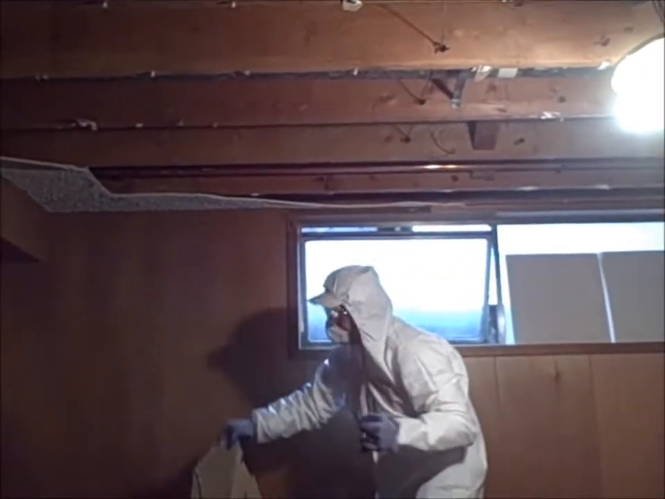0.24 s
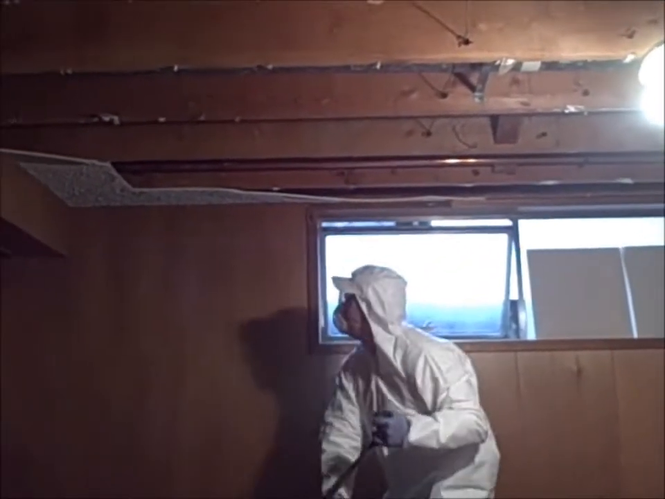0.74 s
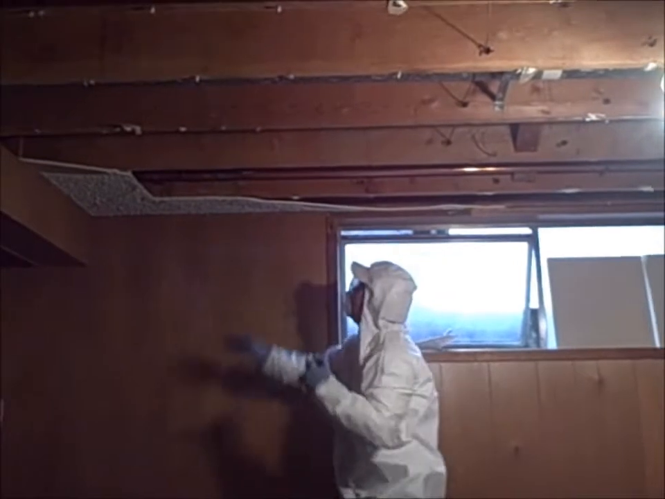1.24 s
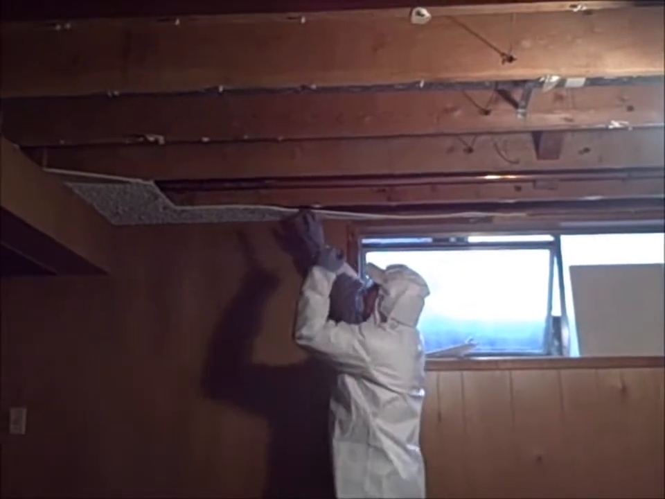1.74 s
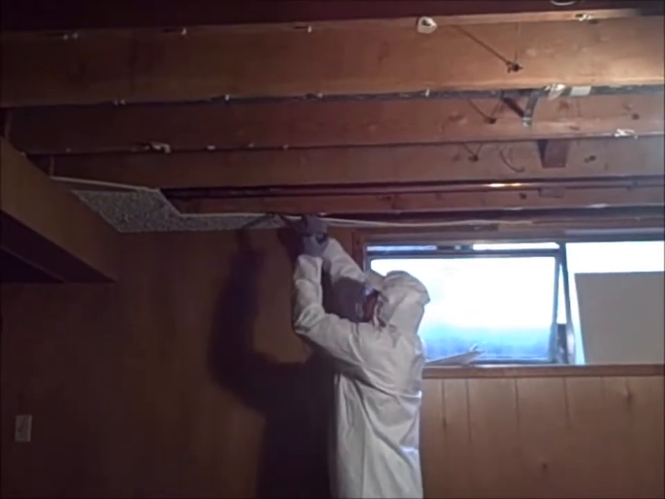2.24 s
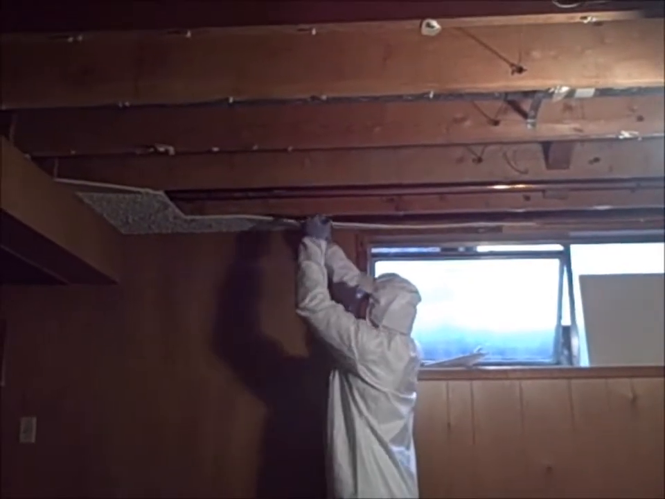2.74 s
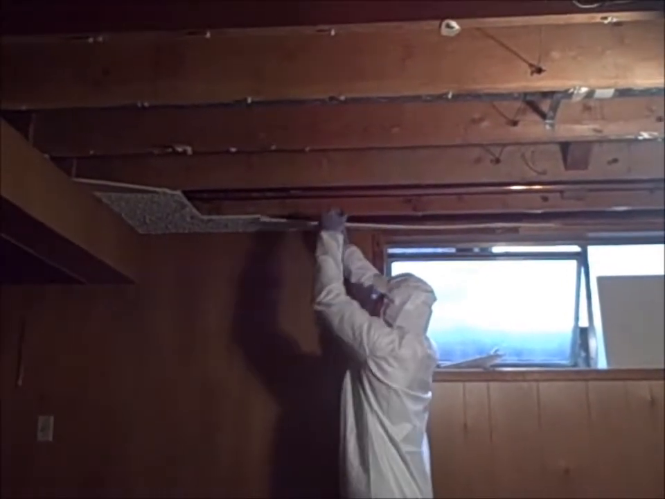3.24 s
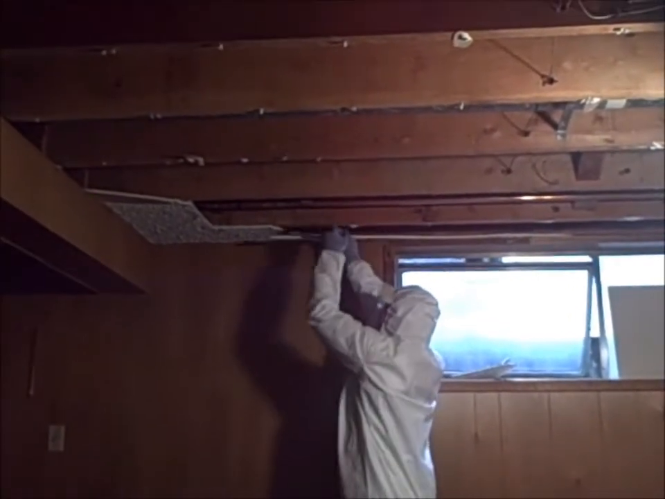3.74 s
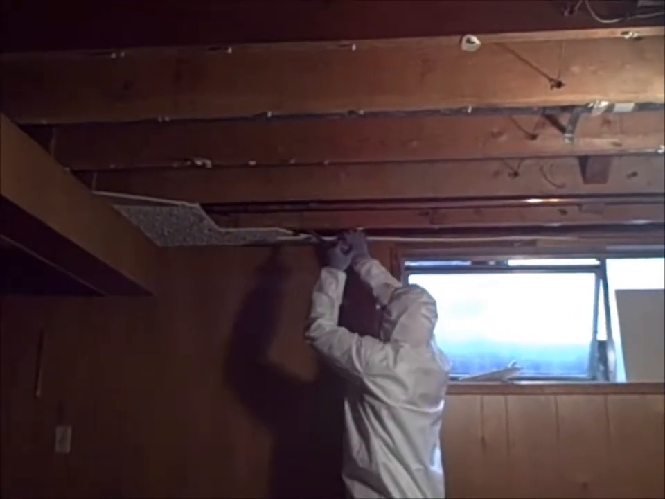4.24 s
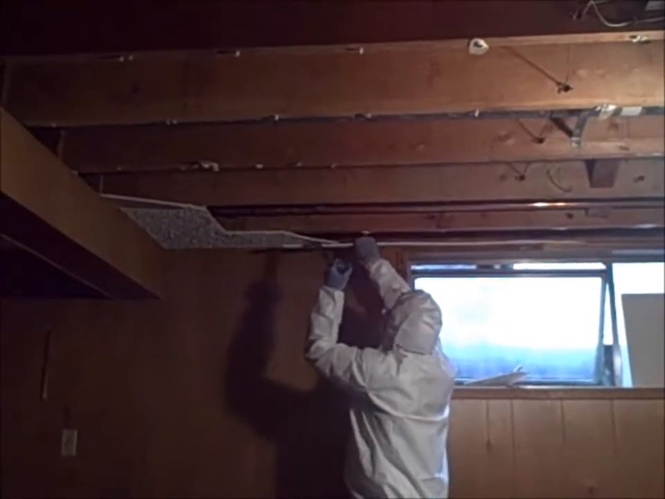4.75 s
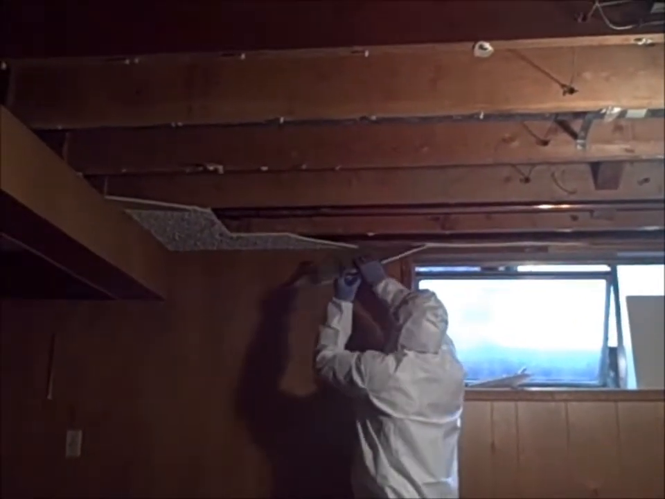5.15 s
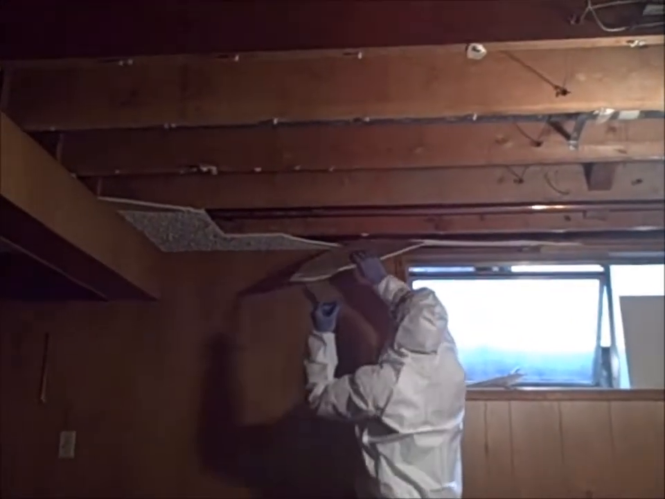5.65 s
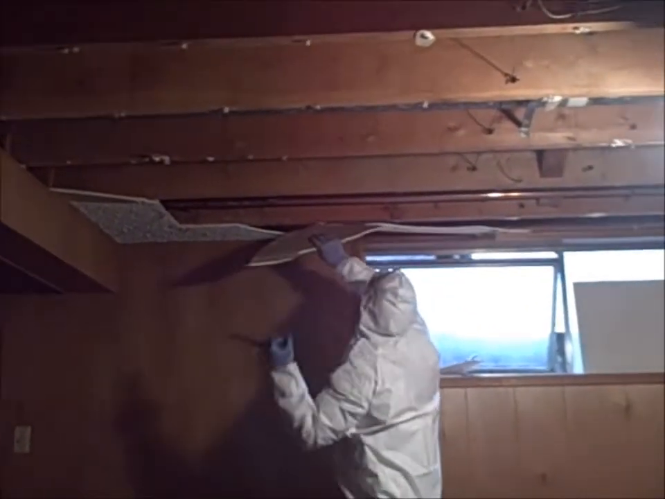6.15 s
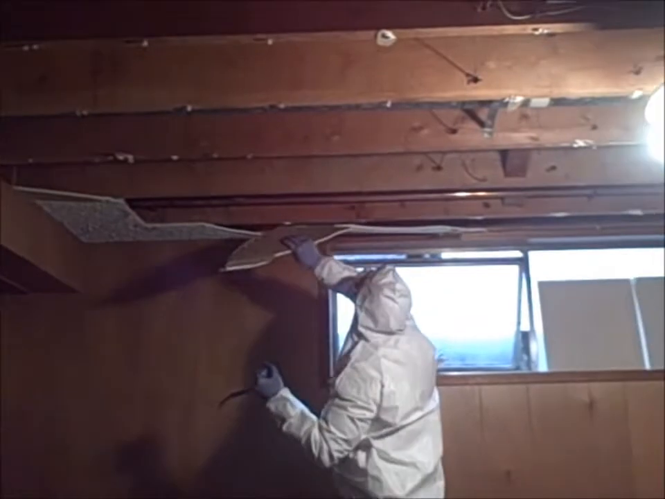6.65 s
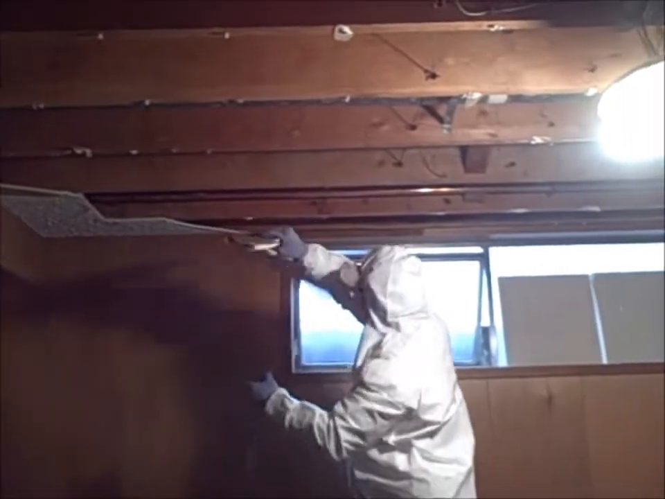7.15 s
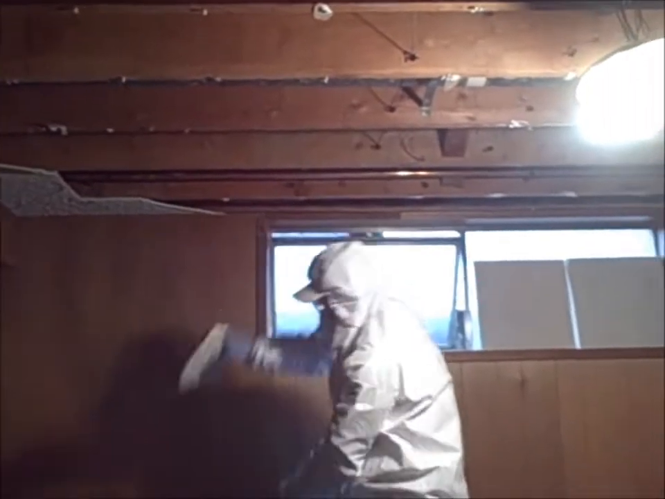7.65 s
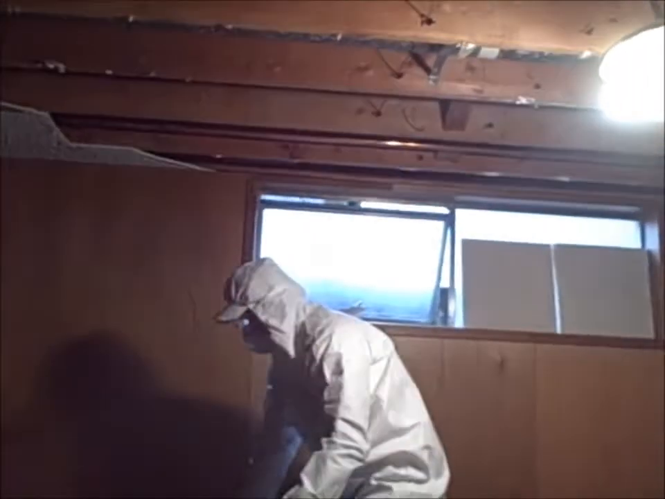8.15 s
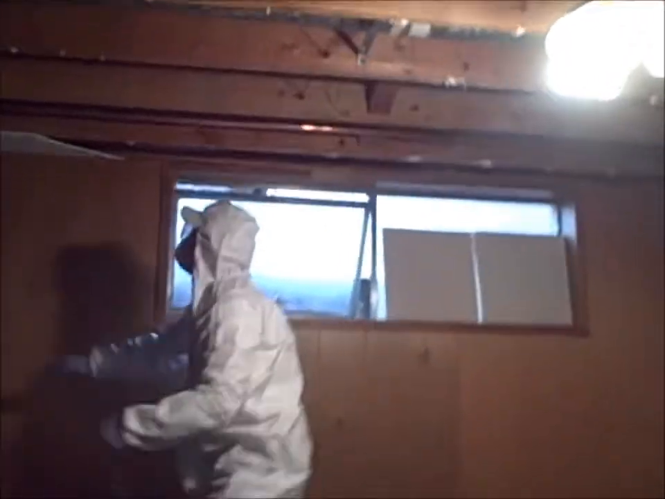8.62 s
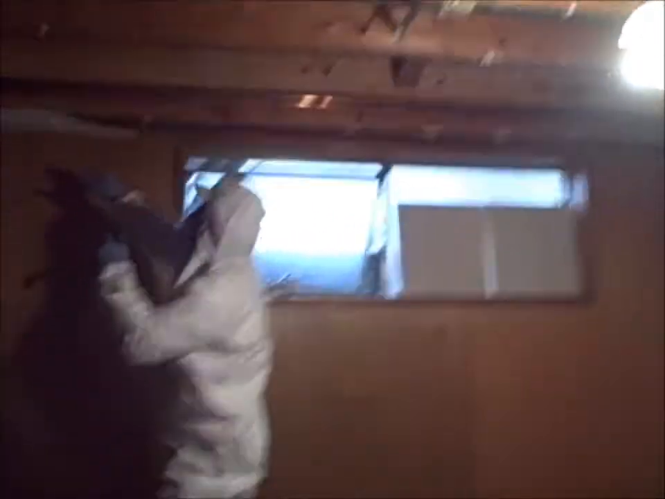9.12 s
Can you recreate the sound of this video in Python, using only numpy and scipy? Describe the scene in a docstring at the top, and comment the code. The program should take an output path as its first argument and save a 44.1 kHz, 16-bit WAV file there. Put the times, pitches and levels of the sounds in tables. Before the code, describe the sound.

Brittle ceiling panel cracks, snaps and knocks off wooden joists in a bare basement, with scraping hands, crinkly coverall rustle and dropped pieces clattering.

```python
"""Brittle ceiling panels crack and knock as a worker prises them off wooden joists and drops the pieces.
Each contact is a short noise burst in five bands with wood resonances; pieces, joists and snaps add fading tones.
Between contacts, uneven noise makes the groaning structure, the scrapes and the rustle of a crinkly coverall.
The bare basement answers with noise tails of about half a second or less. Steady room noise and hiss lie below,
and a small camera microphone clips softly."""
import sys
import numpy as np
from scipy import signal
from scipy.fft import rfft, irfft, next_fast_len
from scipy.io import wavfile
from scipy.ndimage import uniform_filter1d, map_coordinates

SR = 44100
rng = np.random.default_rng(int(sys.argv[2]) if len(sys.argv) > 2 else 0)


def store_wav(level_fs):
    """Save 16-bit WAV to argv[1]."""
    pcm = np.round(np.clip(np.atleast_2d(level_fs), -1, 1) * 32767)
    wavfile.write(sys.argv[1], SR, pcm.T.astype(np.int16))


def magnitude_from_level(level_db):
    """Linear magnitude for a level in decibels (20 dB per decade)."""
    exponent = np.asarray(level_db, float) / 20
    return 10 ** exponent


N = 413658  # length of the scene in samples

# The five bands of each contact (thud, knock, clack, crack, sizzle): low_hz, high_hz
BANDS = [(80, 220), (220, 600), (600, 1500), (1500, 5000), (5000, 15500)]
# Resonances of joists and panel: pitch_hz, width_hz, level_db over the plain response
WOOD_MODES = [(98, 10, -12.5), (146.6, 6.7, 10), (234, 23, 2), (354, 16.7, 2), (463, 19, 2.5), (625, 20, 2),
              (816, 255, 3), (2130, 130, 0.5), (3840, 750, 1)]
# How long the room rings, as time to fall 60 dB: pitch_hz, t60_s
ROOM_RINGING = [(100, 0.52), (300, 0.42), (800, 0.49), (2000, 0.3), (5000, 0.34), (12000, 0.23)]
# Tone colour of the quiet room and the microphone's hiss, only the shape counts: pitch_hz, level_db
AIR_COLOUR = [(15, -30.5), (25, 9.5), (82, 10), (149, 9), (190, 2), (242, -3.5), (463, 6), (1520, -20),
              (14000, -5), (16000, -18)]
AIR_LEVEL_DB = -65.5  # rms

# Brittle cracks, short contacts, all turned down together later:
# start_s, crack_db, then against the crack: knock_db, clack_db, sizzle_db
CRACK_CONTACTS = [(.1258, -63, -3, -13, -12), (0.267, -47, -16, -14, -1), (.329, -46, -20, -28, 0),
                  (0.6461, -51.5, -8, 1, 6.5), (0.7419, -36.5, -35, -21, -18),
                  (.826, -28, -14, -10.5, -2.5), (.97, -31.5, -21, -21, -4), (1.0682, -27.5, 6.5, -11, -5),
                  (1.1177, -24.5, 1.5, -8.5, -2.5), (3.2742, -32.5, -21, -31, -4.5),
                  (3.309, -18.5, -4.5, -16, -5.5), (3.6432, -26.5, -2.5, -20, -10.5),
                  (4.1592, -39, -27, -3.5, -15), (4.2659, -42.5, 12, 11, -20), (4.718, -77, -31, -4, -16),
                  (4.9281, -19.5, -0.5, -19.5, -11), (5.5676, -38, -9, -17, -11),
                  (5.6512, -49.5, -9, -4, -3), (5.687, -42, -28, -24, -1), (5.725, -36.5, -35, -18, -7.5),
                  (5.8209, -29.5, -11.5, -8.5, -2), (6.011, -48, -9, -24, 6), (6.08, -48, -15, -20, -11),
                  (6.1287, -57, -19, -19, -6), (6.7827, -37.5, -18, -3.5, .6),
                  (7.04, -28.5, -33, -23.5, -10.5), (7.1618, -28, -21.5, -24.5, -8.5),
                  (7.4487, -37, -16, -7.5, -2.5), (7.6058, -30.5, -2, -8, -5),
                  (7.6198, -24.5, -46, -10, -8), (7.7524, -22, -11, -12.5, -1.5),
                  (7.772, -22.5, -43, -20, -0.5), (7.78, -36, -28, -22, -21),
                  (7.8789, -17.5, -3.5, -6.5, -10.5), (8.4722, -21.5, 0, -4.5, -8),
                  (8.5035, -2, -16.5, -13.5, -18.5), (9.0091, -43.5, -10, -4, -5)]
# Pushes and tugs, soft contacts that swell in: same columns as the cracks
TUG_CONTACTS = [(.942, -29.5, -6, -15.5, -1), (1.1894, -26, -12, -36, -13), (1.721, -38, -12, -6, 8),
                (2.4711, -55.5, 12.5, -10, -6), (2.5344, -46, 4.5, -8, -5),
                (2.9249, -44.5, 5.5, -7.5, -5.5), (3.205, -42, 0, -6, -5), (3.2265, -46.5, 13, -6, 0),
                (3.622, -28.5, -0.5, -15, -10), (4.4691, -50.5, 12, -13.5, 3), (4.6316, -50, -5, -12, -10),
                (4.8055, -53, -8, -16, 12), (4.9178, -23, -8, -12, -5), (5.202, -37.5, 13, -4, -1),
                (5.268, -54, 11, -11, -13), (5.35, -49.5, 19, 13, -1), (5.388, -46.5, 22, 14, -6),
                (5.45, -39, 13, -6, -5), (6.8776, -32.5, -10.5, -7.5, -6.5), (7.5265, -31.5, -24, -21, -5),
                (7.6658, -22.5, -16, -10, -0.2), (8.002, -18, -14.5, -16, -12.5),
                (8.9094, -48.5, -16, -28, 7), (9.2328, -42, -22.5, -5, 0)]
CRACK_MS, TUG_MS = 5.2, 20.8  # time constants of the fading bursts
CRACK_THUD_DB, TUG_THUD_DB = -15.5, -9.5  # the joists' thud against the panel's knock
CREST_DB = -6  # rms of a crack under its peak
CONTACT_CUT_DB = -4.0  # turns all contacts down together

# The coverall and the hands: time_s, rustle_db, scrape_db against the rustle
RUSTLE_AND_SCRAPE = [(0, -52.5, -5), (.2, -57, -1.5), (.55, -58, -6), (.8, -56, -1.5), (1.02, -48.5, -4),
                     (1.17, -38.5, 2.5), (1.33, -43.5, -3.5), (1.49, -46, -4.5), (1.65, -48.5, -5.5),
                     (1.88, -57, -3.5), (2.38, -63.5, -4), (3.14, -69, -1.3), (3.4, -60, 1),
                     (3.65, -62.5, -4), (3.79, -49, -1.5), (3.9, -55, 6), (3.96, -65.5, 3),
                     (4.101, -63.5, -4.5), (4.7, -58, -4), (5.02, -54, -1), (5.35, -65, -1),
                     (5.49, -65.5, 0), (5.72, -59, 0.5), (5.95, -53.5, -5), (6.24, -44.5, -5.5),
                     (6.5, -55, -1.5), (6.7, -58.5, -1.5), (7.1, -53.5, -7), (7.6, -54, -3.5),
                     (7.79, -44.5, 12.5), (7.89, -42, -7.5), (8.15, -47, -8), (8.28, -54, -4.5),
                     (8.779, -52, -1.5), (9.14, -54, -4), (9.38, -48.5, 0.5)]
# Single swishes of a sleeve: peak_s, rise_s, rustle_db
SLEEVE_SWISHES = [(.37, 0.099, -58.5), (1.74, 0.065, -46.5), (2.07, 0.075, -58), (2.28, 0.13, -52.5),
                  (2.52, .04, -58.5), (2.66, 0.097, -62.5), (2.88, 0.11, -63), (3.02, 0.055, -63.5),
                  (4.24, 0.021, -64), (4.46, 0.05, -55), (4.58, 0.06, -51), (4.86, 0.064, -55.5),
                  (5.16, 0.034, -57), (5.24, 0.04, -47), (5.399, 0.066, -42.5), (5.76, 0.034, -50.5),
                  (6.08, 0.033, -48), (6.96, 0.035, -61), (7.22, 0.06, -47.5), (7.33, .06, -48),
                  (8.34, 0.054, -50.5), (8.43, .04, -60), (8.9, 0.03, -51), (9.02, .04, -50.5)]
SWISH_FALL_S = 0.057
# The load on the ceiling: time_s, panel_flex_db, joist_groan_db against the flex
CEILING_STRAIN = [(0.0, -74, -3), (0.65, -77, -12), (0.89, -62.5, 12), (1.04, -52, -5), (1.2, -33, -9),
                  (1.49, -60, -11), (2.48, -72, 5), (2.64, -62.5, -1), (3.05, -74, 9), (3.47, -54, 5.5),
                  (4.49, -55.5, -9), (4.62, -73, -11), (4.91, -66, 7), (5.09, -63.5, 14), (5.41, -31, -26),
                  (5.64, -72, -1), (6.24, -58, -11), (6.63, -65, -5), (7.0, -60.5, -7), (7.31, -73, -15),
                  (7.58, -66, -3), (7.81, -56, -7), (7.97, -36, -23), (8.18, -62, -13), (8.49, -64.5, -11),
                  (8.62, -56, -17), (8.99, -61.5, -8), (9.38, -63.5, -5)]
CREAK_DB, RUB_DB = -18, -6.5  # creak against the flex; dull rub against the scrape
PATCHY_DB = 1.3  # spread of the uneven patches in pitch and time

# Snaps of the plaster skin: start_s, pitch_hz, level_db
PLASTER_SNAPS = [(.6495, 12500, -31), (0.97, 2480, -23.5), (3.31, 3760, -15), (3.76, 3600, -30),
                 (4.1582, 1236, -28), (4.9286, 4550, -8.5), (5.83, 1750, -12.5), (6.7853, 12000, -25),
                 (7.0425, 4500, -19), (7.1612, 3970, -14.5), (7.7723, 2900, -15), (7.782, 3000, -22)]
# A joist is set ringing: start_s, pitch_hz, level_db
JOIST_RINGS = [(.83, 138, -40.5), (0.946, 126, -34.5), (1.122, 102, -25.5), (1.85, 253, -57),
               (2.05, 258, -54), (2.2, 104, -52), (2.928, 155, -41), (3.23, 153, -30), (3.639, 159, -30),
               (4.097, 154, -32), (4.201, 138, -37), (4.468, 153, -41), (4.563, 161, -42),
               (4.635, 154, -39), (4.932, 153, -32), (5.419, 151, -41), (5.5, 138.5, -37.5),
               (6.879, 169, -51), (7.878, 234, -30.5), (8.505, 187, -35)]
# The floor shakes: start_s, level_db
FLOOR_BOOMS = [(.942, -43), (1.116, -40), (3.309, -53), (3.638, -53), (8.504, -63)]
SNAP_T60_S, JOIST_T60_S, BOOM_T60_S = 0.0035, 0.13, 0.62
BOOM_HZ = 41
# A panel piece rings: start_s, lowest_pitch_hz, level_db, tilt_db per octave towards the upper modes,
# ring (times as long as a loose piece)
PANEL_PIECES = [(1.0684, 400, -15, -21, 0.52), (1.119, 436, -12.5, -7.5, 0.22),
                (3.315, 330.5, -34.5, 2, 1.6), (4.1592, 414, -50, 8, 0.74), (4.267, 482, -26, -2, 0.62),
                (4.932, 335, -21, -15, 0.88), (5.212, 612, -28, -30, 1.3), (5.405, 332, -25, -9, 1.14),
                (5.826, 660, -38, 5, .3), (7.045, 612, -39, -6, 0.39), (7.165, 667, -43, -11, 0.36),
                (7.452, 750, -43, -6, .45), (7.608, 680, -34, -8, .35), (7.883, 402, -18, -3.5, 0.67),
                (8.474, 405, -39, 0, 0.96), (8.506, 405, -20.5, 8.5, 0.97)]
# Modes of a loose piece: multiple (of the lowest pitch), level_db, t60_s
PANEL_MODES = [(1, -4, 0.19), (2.01, -1, 0.05), (2.17, -3.5, 0.055), (3.1, -1, .015), (5.02, -12, .022)]
# The steel bar touches a nail: start_s, level_db
BAR_PINGS = [(7.449, -47)]
# Modes of the steel bar: pitch_hz, level_db, t60_s
BAR_MODES = [(2550, 1, .08), (3800, -5, .1), (4392, -1.5, .14), (4400, 1, 0.089), (5700, -8, .13)]


def unit(x):
    """Scale to rms 1 along time."""
    return x / np.sqrt(np.mean(x ** 2, axis=-1, keepdims=True) + 1e-20)


def along(points, hz):
    """Read a curve of (pitch_hz, value) points on a logarithmic pitch axis."""
    point_hz, value = np.transpose(points)
    return np.interp(np.log(hz + 1), np.log(point_hz + 1), value)


def add(out, times, sounds):
    """Lay each sound into out at its time."""
    for start_s, sound in zip(times, sounds):
        out[round(start_s * SR):][:len(sound)] += sound
    return out


def wander(rows, steps, per_s, spread_db, t):
    """A gain for each row that drifts at random, with per_s random points a second joined by lines."""
    points = rng.standard_normal((rows, steps))
    drift = np.array([np.interp(t * per_s, np.arange(steps), row) for row in points])
    return magnitude_from_level(spread_db * drift)


def colour(levels_db, hz):
    """Gain per root Hz from rows of five band levels, lifted where the wood resonates and weak in the bass."""
    low, high = np.transpose(BANDS)
    centre_hz = np.sqrt(low * high)
    density_db = levels_db - 10 * np.log10(high - low)
    joined_db = np.array([along(np.transpose([centre_hz, row]), hz) for row in density_db])
    modes = sum((magnitude_from_level(db) - 1) / (1 + ((hz - centre) / (width / 2)) ** 2) for centre, width, db in WOOD_MODES)
    bass_cut = np.sqrt(1 + (95 / (hz + 1)) ** 8)
    return magnitude_from_level(joined_db) * (1 + modes) / bass_cut


def causal(gain):
    """Minimum-phase response: has the given gain and puts its energy as early as possible."""
    cepstrum = irfft(np.log(gain + 1e-9))
    half = cepstrum.shape[-1] // 2
    cepstrum[:, 1:half] *= 2
    cepstrum[:, half + 1:] = 0
    return np.exp(rfft(cepstrum))


def reverb(rise_s):
    """The room: one half-second noise tail per rise time, in which each pitch dies at its own speed."""
    noise = rng.standard_normal((len(rise_s), SR // 2))
    hz, t, z = signal.stft(noise, SR, nperseg=256)
    fading = z * magnitude_from_level(-60 * t / along(ROOM_RINGING, hz)[:, None])
    tails = signal.istft(fading, SR, nperseg=256)[1][:, :SR // 2]
    build_up = np.sqrt(1 - np.exp(-np.arange(SR // 2) / SR / rise_s[:, None]))
    return tails * build_up


def air():
    """The steady background: noise shaped to the colour of the quiet room and the hiss."""
    m = next_fast_len(N)
    gain = magnitude_from_level(along(AIR_COLOUR, np.fft.rfftfreq(m, 1 / SR)))
    noise = irfft(rfft(rng.standard_normal(m)) * gain, m)[:N]
    return magnitude_from_level(AIR_LEVEL_DB) * unit(noise)


def work():
    """Strained joists and panel, scraping hands and crinkling cloth: dense uneven slips shaped over time."""
    boost_db = np.minimum(2.5 * rng.exponential(size=N), 8)
    slips = (rng.random(N) < 2000 / SR) * rng.standard_normal(N) * magnitude_from_level(boost_db)  # about 2000 a second
    swell_points = rng.standard_normal(N // 1500 + 4)
    swell = magnitude_from_level(1.74 * map_coordinates(swell_points, [np.arange(N) / 1500]))
    grain = unit(.4 * unit(slips) + swell * rng.standard_normal(N))
    hz, t, z = signal.stft(grain, SR, nperseg=1024)

    time_s, rustle, scrape = np.transpose(RUSTLE_AND_SCRAPE)
    rustle_db, scrape_db = np.interp(t, time_s, rustle), np.interp(t, time_s, scrape)
    time_s, flex, groan = np.transpose(CEILING_STRAIN)
    flex_db, groan_db = np.interp(t, time_s, flex), np.interp(t, time_s, groan)

    peak_s, rise_s, swish_db = np.transpose(SLEEVE_SWISHES)[:, :, None]
    width_s = np.where(t < peak_s, rise_s, SWISH_FALL_S)
    swishes = magnitude_from_level(swish_db) * np.exp(-((t - peak_s) / width_s) ** 2)
    rustle_db = 10 * np.log10(magnitude_from_level(rustle_db) ** 2 + np.sum(swishes ** 2, axis=0))
    scrape_db = rustle_db + scrape_db

    # smooth random patches over 14 pitch steps and 3 time steps
    patches = uniform_filter1d(rng.standard_normal(z.shape), size=14, axis=0)
    patches = uniform_filter1d(patches, size=3, axis=1)
    z = z * magnitude_from_level(PATCHY_DB * patches / patches.std())

    # the middle band holds both the creak and the rub
    middle_db = 20 * np.log10(np.hypot(magnitude_from_level(flex_db + CREAK_DB), magnitude_from_level(scrape_db + RUB_DB)))
    levels_db = np.transpose([flex_db + groan_db, flex_db, middle_db, scrape_db, rustle_db])
    shaped = z * colour(levels_db, hz).T * np.sqrt(SR / 2)
    return signal.istft(shaped, SR, nperseg=1024)[1][:N]


def struck():
    """Every mode of every struck thing, as rows of start_s, pitch_hz, level_db, t60_s."""
    rows = [(*row, SNAP_T60_S) for row in PLASTER_SNAPS]
    rows += [(*row, JOIST_T60_S) for row in JOIST_RINGS]
    rows += [(s, BOOM_HZ, db, BOOM_T60_S) for s, db in FLOOR_BOOMS]
    for s, hz, db, tilt, ring in PANEL_PIECES:
        for multiple, mode_db, t60 in PANEL_MODES:
            rows.append((s, multiple * hz, db + mode_db + tilt * np.log2(multiple), t60 * ring))
    for s, db in BAR_PINGS:
        rows += [(s, hz, db + mode_db, t60) for hz, mode_db, t60 in BAR_MODES]
    return rows


def notes():
    """Struck things swing at their own pitch, start within a cycle or two, die away and echo in the room."""
    start_s, hz, db, t60 = np.transpose(struck())[:, :, None]
    t = np.arange(SR // 2) / SR
    onset = 1 - np.exp(-t * hz / 0.29)
    direct = magnitude_from_level(db - 60 * t / t60) * np.sin(2 * np.pi * hz * t) * onset
    direct = direct * wander(len(start_s), 40, 70, 2.5, t)  # every tone wavers a little in level, at random
    tails = reverb(np.full(len(start_s), .006))
    tails = tails / np.linalg.norm(tails, axis=1, keepdims=True)
    sounds = magnitude_from_level(-4) * signal.fftconvolve(direct, tails, axes=1)
    sounds[:, :len(t)] += direct
    return add(np.zeros(N + SR), start_s[:, 0], sounds)[:N]


def hits():
    """Every contact is a crumbling burst and the room's answer, both in that contact's colour."""
    rows = [(*row, CRACK_MS, CRACK_THUD_DB) for row in CRACK_CONTACTS]
    rows += [(*row, TUG_MS, TUG_THUD_DB) for row in TUG_CONTACTS]
    start_s, peak_db, knock_db, clack_db, sizzle_db, ms, thud_db = np.transpose(rows)
    lasts_s = ms[:, None] / 1000
    t = np.arange(SR // 2) / SR
    rise = 1 - np.exp(-t / (lasts_s ** 2 / 0.041))  # short contacts start at once, long ones swell in
    crumble = 1.06 * rng.standard_normal((len(start_s), len(t))) * np.exp(-t / lasts_s)
    rattle = wander(len(start_s), 160, 300, 2, t)  # loose bits bounce unevenly
    bursts = rise * rattle * (crumble + reverb(lasts_s[:, 0]))

    crack_db = np.full(len(ms), CREST_DB)
    against_db = np.transpose([knock_db + thud_db, knock_db, clack_db, crack_db, sizzle_db])
    levels_db = peak_db[:, None] + against_db
    m = 2 ** 15
    response = causal(colour(levels_db, np.fft.rfftfreq(m, 1 / SR))) * np.sqrt(SR / 2)
    sounds = irfft(rfft(bursts, m) * response, m)
    return add(np.zeros(N + SR), start_s, magnitude_from_level(CONTACT_CUT_DB) * sounds)[:N]


def scene():
    """All sources added up at the single microphone."""
    return (air() + work() + notes() + hits())[None]


def top_cut(x):
    """Nothing passes above the cut-off."""
    return signal.sosfilt(signal.butter(12, 17020, fs=SR, output="sos"), x)


def record(dry):
    """The camera microphone dulls the top and clips loud peaks softly; then all above 15950 Hz is cut off."""
    dulled = signal.sosfilt(signal.butter(2, 15000, fs=SR, output="sos"), dry)
    clipped = dulled / (1 + np.abs(dulled / .5) ** 6) ** (1 / 6)  # never beyond 0.5
    below_cut = np.fft.rfftfreq(N, 1 / SR) < 15950  # Hz
    finished = irfft(rfft(clipped) * below_cut, N)
    return top_cut(finished)


dry = scene()
out = record(dry)
store_wav(out)
```